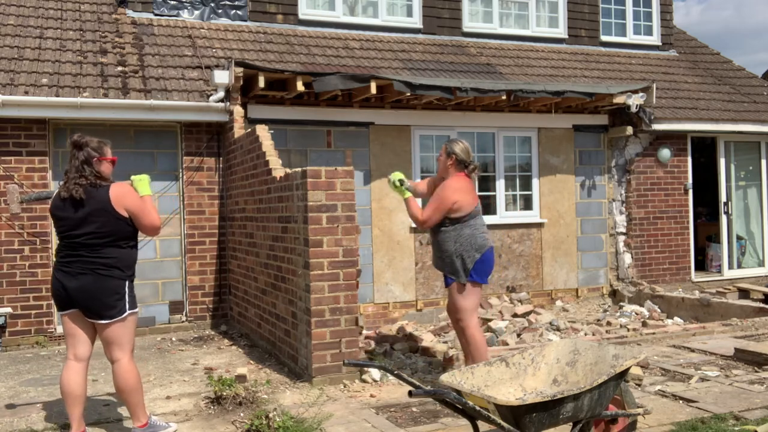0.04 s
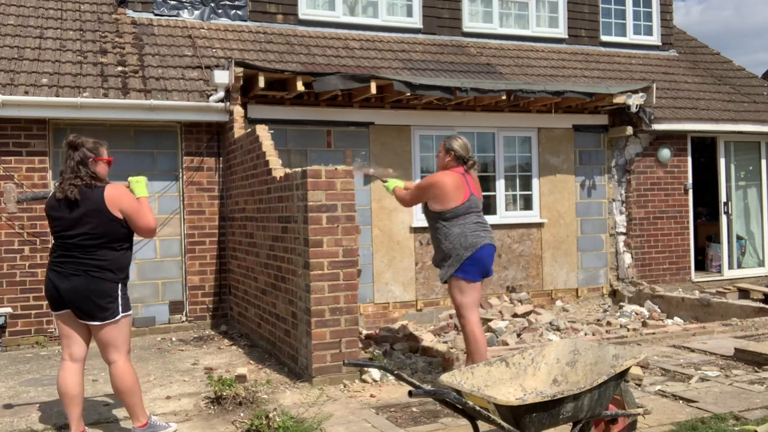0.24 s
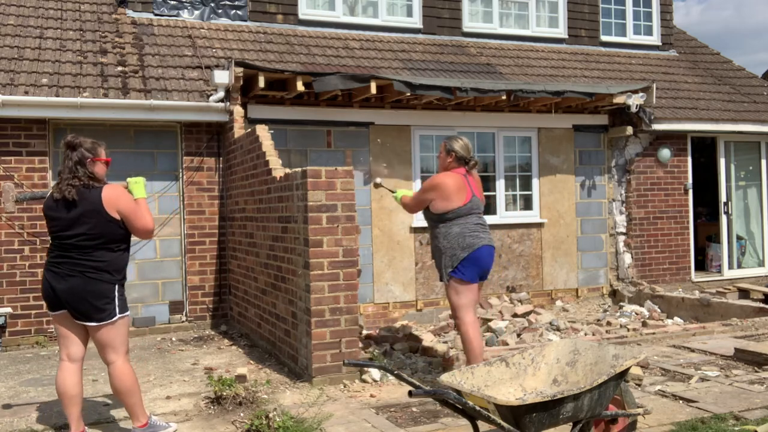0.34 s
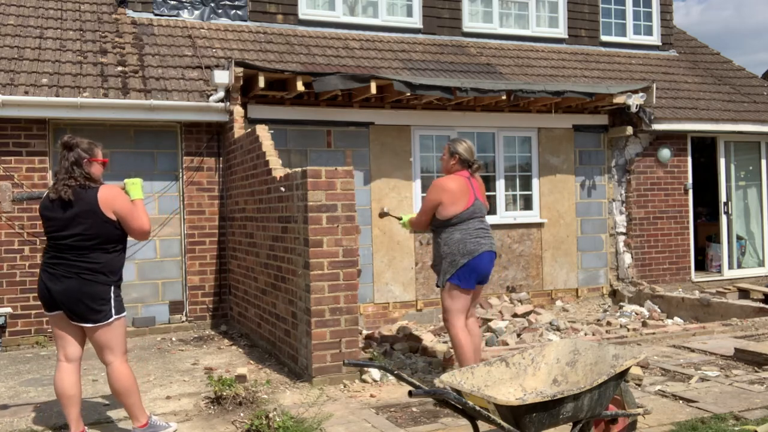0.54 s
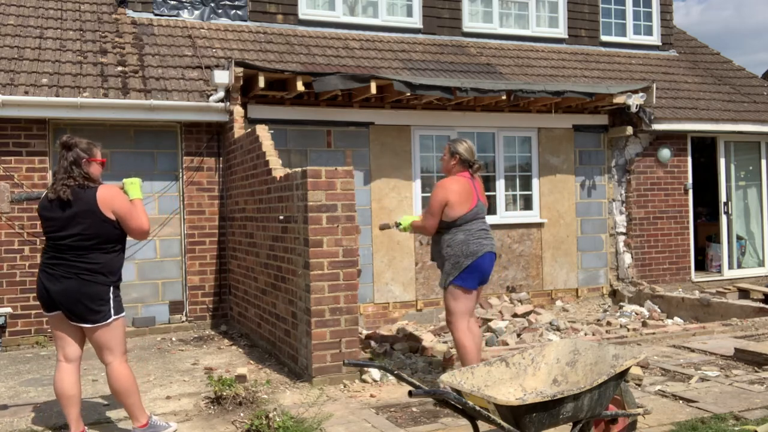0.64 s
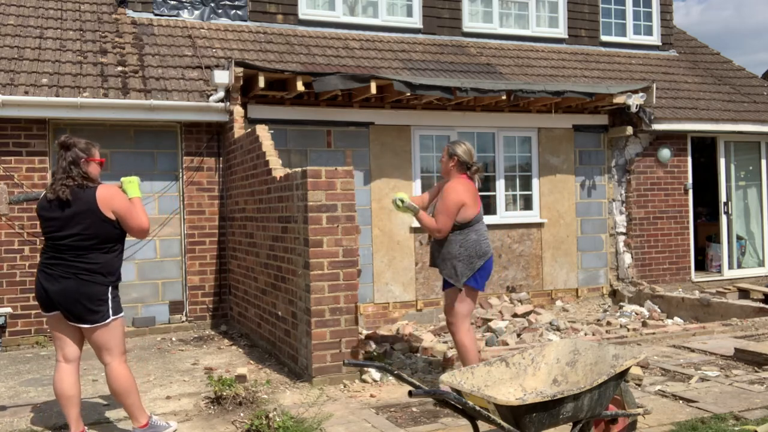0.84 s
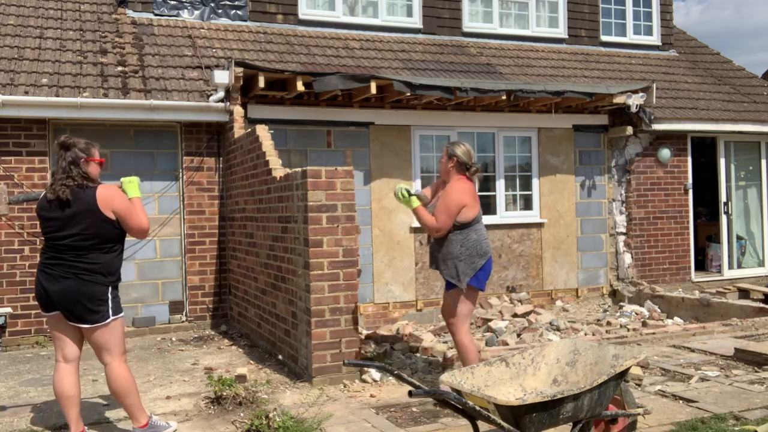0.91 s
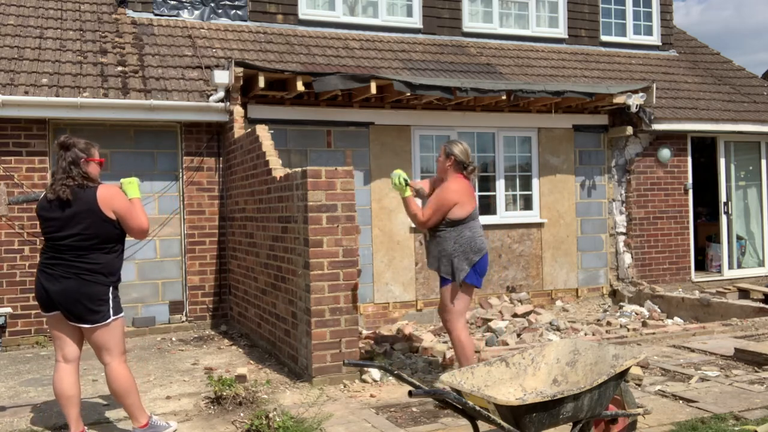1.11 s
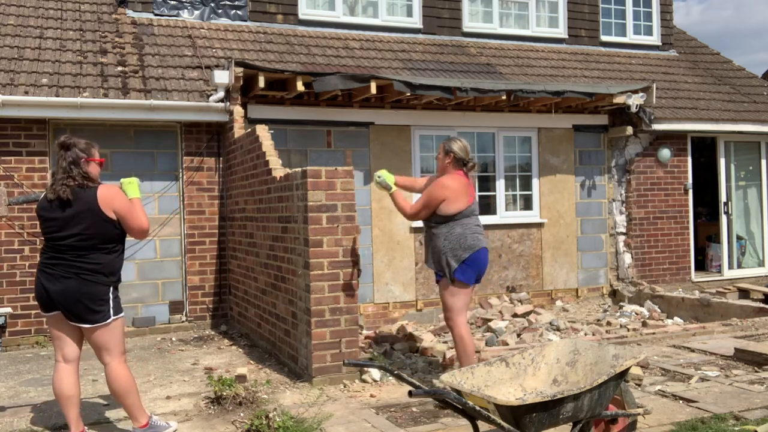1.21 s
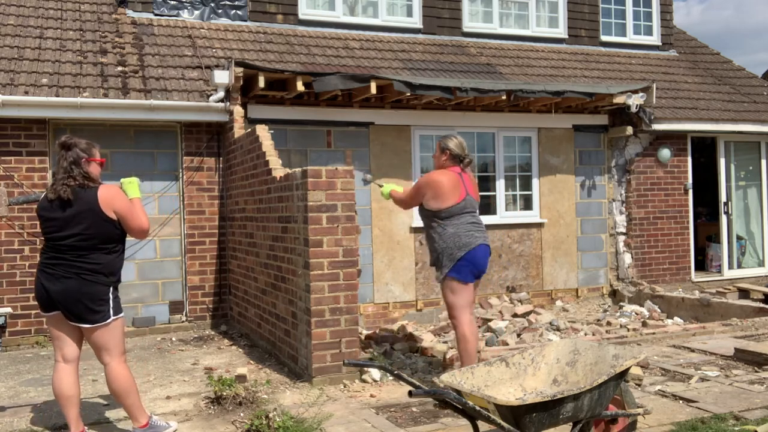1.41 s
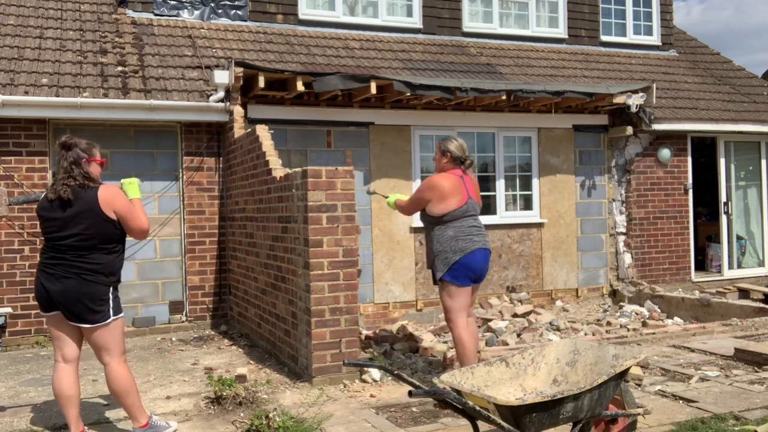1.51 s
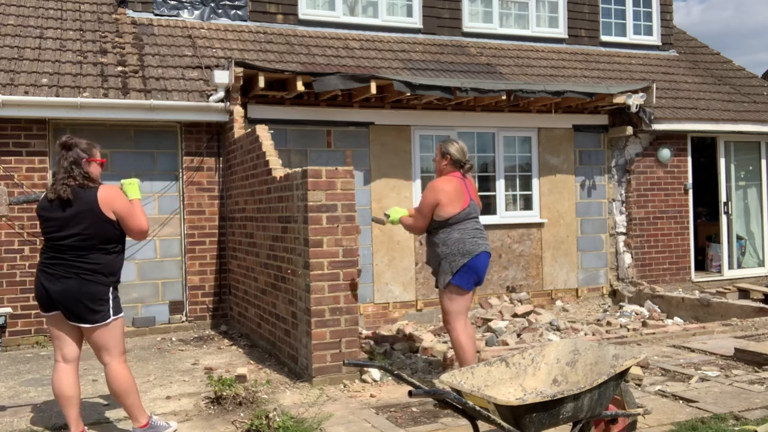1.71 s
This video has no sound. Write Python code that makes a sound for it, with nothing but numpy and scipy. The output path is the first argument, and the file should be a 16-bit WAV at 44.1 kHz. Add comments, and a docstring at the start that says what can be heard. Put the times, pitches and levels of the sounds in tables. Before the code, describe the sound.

Two hammer blows on brick, each a sharp crack with a dull thud, are heard from a few metres away outdoors. After each one, bits of mortar click onto rubble and grit trickles, over a faint distant hum.

```python
"""Hammering a brick wall

Two heavy hammer blows land on a brick wall in a yard, a few metres away. Each one cracks,
sets the wall thudding and bounces back from the house front. Grit sprays and trickles,
and chips of mortar drop on the rubble, over a faint distant hum."""
import sys
import numpy as np
from scipy import signal
from scipy.fft import rfft, irfft
from scipy.io import wavfile
from scipy.ndimage import uniform_filter1d

SR = 44100
rng = np.random.default_rng(int(sys.argv[2]) if len(sys.argv) > 2 else 0)


def materialize(psi):
    """Save the field psi as 16-bit PCM at rate SR to the path in sys.argv[1].

    A 1-D psi becomes a single channel; in a 2-D psi each row is a channel.
    """
    bounded = np.clip(np.atleast_2d(psi).T, -1, 1)
    quanta = np.round(bounded * 32767).astype(np.int16)
    wavfile.write(sys.argv[1], SR, quanta)


N = 77175
T = np.arange(N) / SR
HZ = np.fft.rfftfreq(N, 1 / SR)

# Levels are relative. A fade is the time a sound takes to drop by 60 dB.
# how alike the two ears hear noise (1 is the same): pitch_hz, likeness
EAR_LIKENESS = [(50, 1), (250, 0.7), (500, -0.4), (1100, .05), (5000, -0.1), (12000, .5)]
# tone of the outdoor air: pitch_hz, level_db
AIR_TONE = [(25, 1), (110, -7.5), (300, -11), (560, -17), (1100, -12.5), (3500, -26),
            (7000, -35), (9000, -43)]
# distant hum: pitch_hz, level_db
HUM_NOTES = [(99, -57), (268, -67.5)]
# faint low tones that sink: start_s, length_s, from_hz, to_hz, level_db
SINKING_TONES = [(.03, 0.58, 209.2, 167.3, -48), (.91, .33, 238, 104.9, -54)]
# how loudly the grit trickles: time_s, level_db
TRICKLE_LEVELS = [(0, -62.5), (.19, -65), (.46, -48), (.55, -67), (.66, -54), (.74, -71), (1.13, -57.5),
                  (1.3, -65), (1.58, -57.5), (1.7, -91)]
# tone of the trickle: pitch_hz, level_db
GRIT_TONE = [(500, -2.5), (1200, 3.5), (4000, 1), (6500, -9), (8500, -28), (16000, -15)]
# sharp specks of grit: start_s, level_db
GRIT_SPECKS = [(0.125, -53.5), (.4695, -34.5), (0.866, -45.5), (0.895, -48), (0.9679, -37), (.988, -40),
               (1.058, -46.5), (1.378, -37.5)]
# tone of the specks and the sandy hiss: pitch_hz, level_db
SAND_TONE = [(300, 4.5), (2000, -7.5), (6500, -7), (8500, -18), (10500, -4.5), (14500, -17.5), (16000, -32)]
# hammer blows: start_s, level_db, tick_db, grit_db, boom_db, pitch_hz, hardness_db (per octave),
# snap_hz, snap_width_hz, snap_db, thud_db, thud_delay_s
HAMMER_BLOWS = [(0.2050, 1, -1, -3, 1, 1095, -3, 4214, 449, -12, -1, 0.00097),
                (1.3286, 0.5, -7.5, -4.5, 4.5, 1130, 3, 1530, 670, -12, -0.5, 0.00295)]
# tone of steel first touching brick: pitch_hz, level_db
TICK_TONE = [(1500, -2), (4400, 12.5), (6200, -20), (8600, -30.5), (10500, 5), (12500, 5), (16500, -7.5)]
# notes of the struck brick: pitch_ratio, level_db, rise_s, fade_s
BRICK_NOTES = [(0.548, -5, 0.0026, 0.022), (0.931, -11, 0.0018, 0.016), (1.061, 6.5, 0.002, 0.0091),
               (1.42, -11.5, 0.0018, 0.024), (1.9, -10, 0.0014, 0.011)]
# bands of noise ringing in the wall and yard: pitch_hz, level_db, rise_s, fade_s
YARD_BANDS = [(54.2, -32, 0.034, 0.9), (113, -27, 0.03, 0.6), (291, -25, 0.0088, 0.68),
              (501, -21.5, 0.0028, 0.46), (1048, -25.5, 0.00067, 0.4), (2070, -32.5, 0.00082, 0.4),
              (4420, -35.5, .002, 0.31), (6450, -44, 0.00091, 0.43)]
# notes the wall shakes at: pitch_hz, level_db, rise_s, fade_s
WALL_NOTES = [(51.2, -21, 0.087, 0.49), (61.66, -19, 0.048, 0.57), (85.35, -25.5, 0.05, 0.6),
              (126.2, -22, 0.032, 0.65), (185, -16, 0.022, 0.32), (238, -10.5, 0.033, 0.37),
              (328.2, -10.5, 0.013, 0.25), (365.9, -13, 0.0015, 0.22), (423.3, -18.5, 0.0034, 0.33),
              (607.7, -19, 0.0044, 0.26), (643.5, -14.5, 0.013, 0.2), (1067, -23.5, 0.0046, 0.29)]
# swells and a dip in the thud and ring as sound returns from the house: delay_s, width_s, change_db
HOUSE_SWELLS = [(0.028, 0.044, 5.5), (0.06, 0.011, -2.5), (.095, 0.015, 4)]
# single echoes of the crack: delay_s, level_db
CRACK_ECHOES = [(.021, -9), (0.026, -14)]
# falling chips of mortar: start_s, level_db, pitch_hz, scatter_s
CHIP_FALLS = [(.261, -26.5, 3070, 0.0045), (0.4654, -27, 1010, 0.0049), (0.612, -38.5, 1596, 0.0057),
              (0.623, -33, 3150, 0.0053), (0.7929, -44, 1060, 0.026), (0.912, -43, 1340, 0.029),
              (1.0426, -32, 1370, 0.0016), (1.082, -33.5, 2050, 0.0055), (1.1227, -38.5, 1560, 0.0076),
              (1.1688, -47, 2200, 0.0013), (1.2471, -36.5, 1560, 0.0024), (1.378, -26.5, 3370, 0.004),
              (1.404, -23, 1290, 0.0023), (1.581, -40, 1266, 0.031)]
# tone of a chip hitting rubble: pitch_hz, level_db
CHIP_TONE = [(200, -1), (750, -9), (1100, 1.5), (2200, -0.5), (4000, -6.5), (6300, -10), (8500, -36.5),
             (16000, -32)]

BOOM_BELOW_HZ, BRIGHT_ABOVE_HZ = 120, 3000


def gain(db):
    """Turns decibels into a number to multiply by."""
    return 10 ** (np.asarray(db) / 20)


def unit_level(sound):
    """Scales a signal so its average strength (rms) is 1."""
    return sound / np.sqrt(np.mean(sound ** 2) + 1e-20)


def curve(points):
    """Joins (pitch, value) points into a curve over all pitches, spaced by octaves."""
    hz, value = np.transpose(points)
    return np.interp(np.log(HZ + 1), np.log(hz + 1), value)


def add(mix, start_s, sound):
    """Adds a sound to the mix at the given time."""
    part = mix[:, max(round(start_s * SR), 0):]
    part += sound[..., :part.shape[1]]


def swell(rise_s, fade_s):
    """A loudness shape that rises and dies away."""
    return (1 - np.exp(-T / max(rise_s, 1e-5))) * gain(-60 * T / fade_s)


def noise(tone):
    """Stereo noise with the given gain at each pitch."""
    left, other = rfft(rng.standard_normal((2, N)))
    likeness = np.clip(curve(EAR_LIKENESS), -1, 1)
    right = likeness * left + np.sqrt(1 - likeness ** 2) * other
    return unit_level(irfft(np.array([left, right]) * tone, N))


def colour(sound, tone_db):
    """Gives clicks a tone, with a filter that rings only after each click (minimum phase)."""
    cepstrum = irfft(np.log(gain(tone_db)), N)
    fold = np.where(np.arange(N) < N // 2, 2., 0)
    fold[0] = 1
    taps = irfft(np.exp(rfft(cepstrum * fold)), N)[:2048]
    return signal.fftconvolve(sound, taps[None] / np.linalg.norm(taps), axes=1)[:, :N]


def grains(per_s=2500, spread_db=2.8):
    """Tiny clicks of uneven size at random times."""
    size = gain(spread_db * np.minimum(rng.exponential(1, N), 4))
    lands = rng.random(N) < per_s / SR
    return unit_level(size * lands * (rng.choice([-1, 1], N) + .5 * rng.standard_normal((2, N))))


def background(air_db=-58, waver=0.013):
    """Quiet outdoor air, a wavering hum and faint sinking tones."""
    out = gain(air_db) * noise(gain(curve(AIR_TONE)))
    for hz, db in HUM_NOTES:
        drift = noise(HZ < 8)[0]
        out += gain(db) * np.sin(2 * np.pi * np.cumsum(hz * (1 + waver * drift)) / SR)
    for start_s, length_s, from_hz, to_hz, db in SINKING_TONES:
        progress = np.minimum(T / length_s, 1)
        hz = to_hz + (from_hz - to_hz) * (1 - progress) ** 2
        add(out, start_s, gain(db) * np.sin(np.pi * progress) * np.sin(2 * np.pi * np.cumsum(hz) / SR))
    return out


def falling_grit(hiss_start_s=.74, hiss_length_s=0.41, hiss_db=-58.5):
    """Grit trickles from the wall, with a patch of sandy hiss and a few sharp specks."""
    flow = gain(np.interp(T, *np.transpose(TRICKLE_LEVELS)))
    out = colour(grains() * flow, curve(GRIT_TONE))
    hiss = colour(grains(per_s=2000, spread_db=3.6), curve(SAND_TONE))
    arch = np.sin(np.pi * np.minimum(T / hiss_length_s, 1))
    add(out, hiss_start_s, gain(hiss_db) * arch * hiss)
    for start_s, db in GRIT_SPECKS:
        add(out, start_s, gain(db) * swell(0, fade_s=.014) * noise(gain(curve(SAND_TONE))))
    return out


def brick_crack(tick_db, pitch_hz, hardness_db, snap_hz, snap_width_hz, snap_db):
    """Steel ticks, the brick's face snaps and its body clacks; a hard blow lifts the high notes."""
    clack = np.zeros(N)
    for ratio, db, rise_s, fade_s in BRICK_NOTES:
        note = np.sin(2 * np.pi * pitch_hz * ratio * T)
        clack += gain(db + hardness_db * np.log2(ratio)) * swell(rise_s, fade_s) * note
    contact = swell(0, fade_s=.004) * rng.choice([-1., 1.], (1, N))
    tick = gain(tick_db - 16.5) * colour(contact, curve(TICK_TONE))
    snap_band = np.exp(-((HZ - snap_hz) / snap_width_hz) ** 2)
    snap = gain(snap_db) * swell(0, fade_s=0.013) * noise(snap_band)
    out = clack + tick + snap
    add(out, .0028, gain(-3) * (tick + snap))  # bounce off the ground
    return out


def mortar_spray(grit_db, band_hz=(9900, 14000)):
    """A blow throws out fine grains of mortar in a high, fading fizz."""
    fizz = signal.sosfilt(signal.butter(5, band_hz, "band", fs=SR, output="sos"), grains())
    return gain(grit_db - 43.5) * swell(0, fade_s=0.36) * unit_level(fizz)


def yard_ring(grit_db, boom_db, top_hz=7200, ripple_db=2.8, flutter_db=2):
    """Wall and yard ring in a fluttering blur, each band rising and dying at its own speed."""
    ripple = unit_level(uniform_filter1d(rng.standard_normal(len(HZ)), size=130))
    ripple *= np.minimum(HZ / 1000, 1)  # uneven peaks, gentler in the bass
    tone = gain(ripple_db * ripple) / (1 + (HZ / top_hz) ** 40)
    flutter = unit_level(gain(flutter_db * noise(HZ < 150)[0]))
    centres_hz = [row[0] for row in YARD_BANDS]
    out = np.zeros((2, N))
    for hz, db, rise_s, fade_s in YARD_BANDS:
        band = curve([(centre, centre == hz) for centre in centres_hz])
        level_db = db + grit_db * (hz > BRIGHT_ABOVE_HZ) + boom_db * (hz < BOOM_BELOW_HZ)
        out += gain(level_db) * swell(rise_s, fade_s) * noise(band * tone)
    return out * flutter


def wall_thud(boom_db, wide_above_hz=436):
    """The wall shakes at its own notes; the higher ones reach the two ears out of step."""
    out = np.zeros((2, N))
    for i, (hz, db, rise_s, fade_s) in enumerate(WALL_NOTES):
        ear_shift = np.array([[0], [np.pi / 2]]) * min((hz / wide_above_hz) ** 2, 1)
        note = (-1) ** i * np.sin(2 * np.pi * hz * T - ear_shift)
        out += gain(db + boom_db * (hz < BOOM_BELOW_HZ)) * swell(rise_s, fade_s) * note
    return gain(-5) * out


def hammer_blows(echo_top_hz=600):
    """Each blow cracks, sprays mortar, shakes the wall and echoes dully off the house."""
    out = np.zeros((2, N))
    house = gain(sum(db * np.exp(-((T - delay) / width) ** 2) for delay, width, db in HOUSE_SWELLS))
    for start_s, db, tick_db, grit_db, boom_db, *brick, thud_db, thud_delay_s in HAMMER_BLOWS:
        crack = brick_crack(tick_db, *brick)
        add(out, start_s, gain(db) * (crack + mortar_spray(grit_db) + house * yard_ring(grit_db, boom_db)))
        add(out, start_s + thud_delay_s, gain(db + thud_db) * house * wall_thud(boom_db))
        echo = signal.lfilter(*signal.butter(1, echo_top_hz, fs=SR), crack)
        sides = [[.5], [1]], [[1], [.5]]  # right, then left
        for (delay_s, echo_db), side in zip(CRACK_ECHOES, sides):
            add(out, start_s + delay_s, gain(db + echo_db) * echo * side)
    return out


def mortar_chips(peak_db=10.5, width_octaves=0.99):
    """Bits of mortar land in a scatter of clicks, with a short tail from the yard."""
    out = np.zeros((2, N))
    for start_s, db, hz, scatter_s in CHIP_FALLS:
        octaves_away = np.log2((HZ + 1) / hz)
        tone_db = curve(CHIP_TONE) + peak_db * np.exp(-(octaves_away / width_octaves) ** 2)
        landing = colour(grains() * swell(0, fade_s=.009 + np.log(1000) * scatter_s), tone_db)
        tail = gain(-10.5) * swell(rise_s=0.0021, fade_s=.3) * noise(gain(tone_db))
        add(out, start_s, gain(db - 5.5) * (landing + tail))
    return out


def scene(lean_db=1.14):
    """All the sounds together, sitting a little to the left."""
    mix = hammer_blows() + mortar_chips() + falling_grit() + background()
    return mix * gain([[lean_db], [-lean_db]])


def record(dry, low_cut_hz=42.8, ceiling=.95, high_cut_hz=16500):
    """The microphone drops the deepest bass, rounds off the peaks and cuts the highest treble."""
    thinned = signal.sosfilt(signal.butter(5, low_cut_hz, "high", fs=SR, output="sos"), dry)
    rounded = thinned / (1 + (thinned / ceiling) ** 6) ** (1 / 6)
    treble_cut = signal.firwin(511, high_cut_hz, window=("kaiser", 9), fs=SR)
    return signal.oaconvolve(rounded, treble_cut[None], "same")


dry = scene()
out = record(dry)
materialize(out)
```